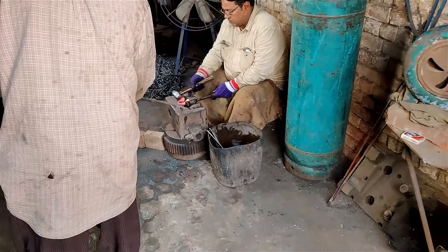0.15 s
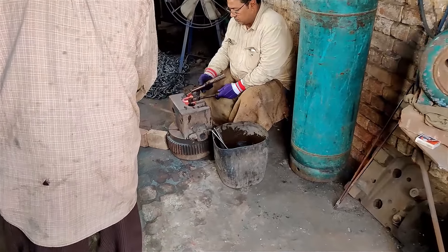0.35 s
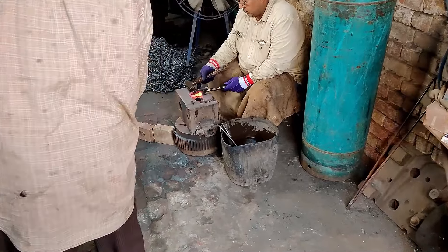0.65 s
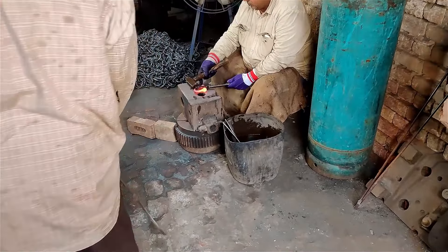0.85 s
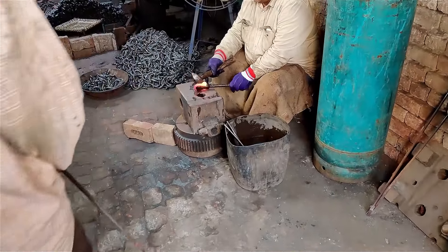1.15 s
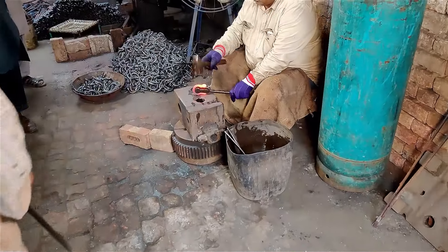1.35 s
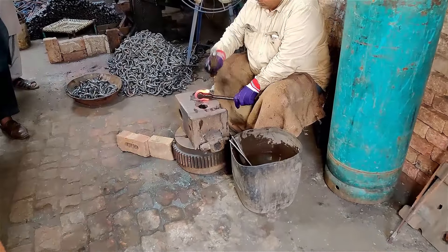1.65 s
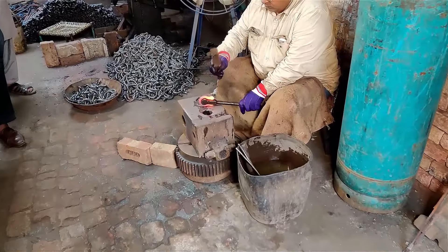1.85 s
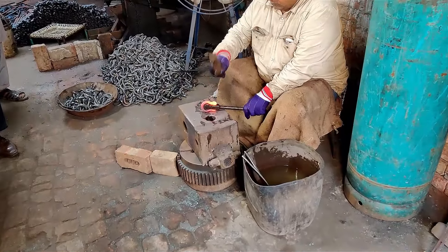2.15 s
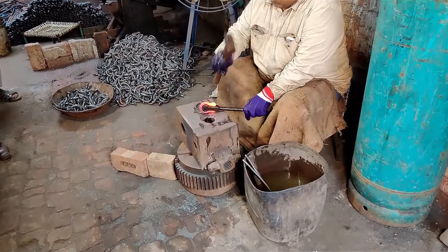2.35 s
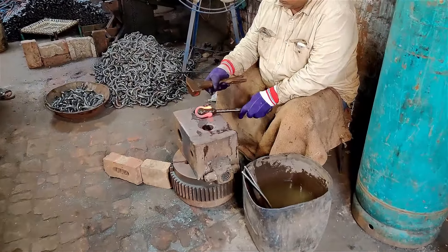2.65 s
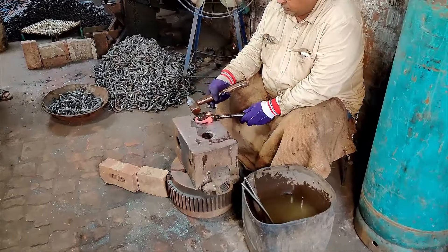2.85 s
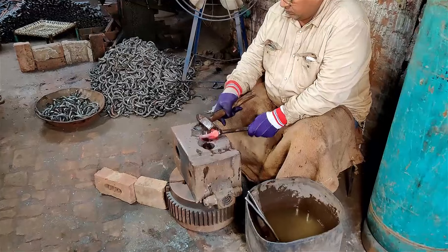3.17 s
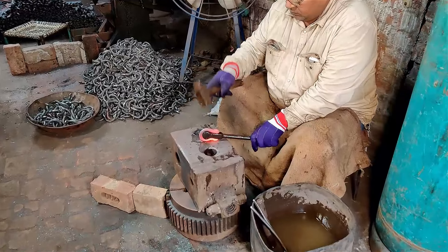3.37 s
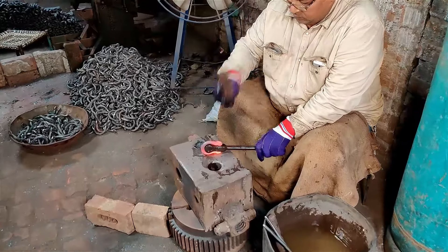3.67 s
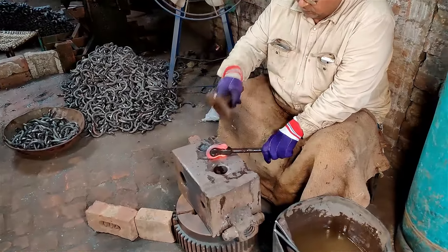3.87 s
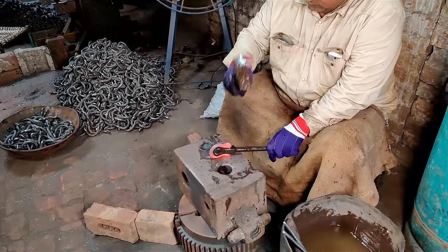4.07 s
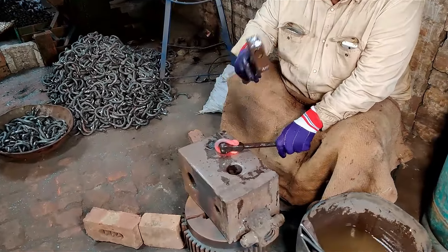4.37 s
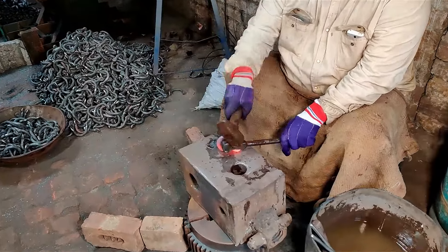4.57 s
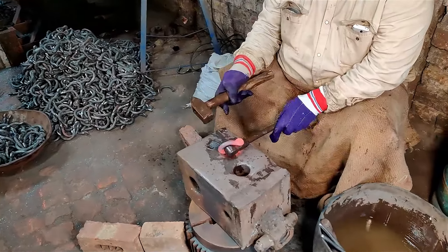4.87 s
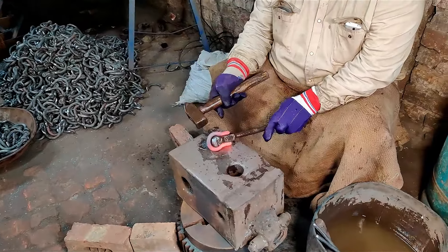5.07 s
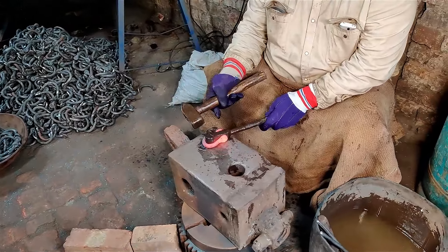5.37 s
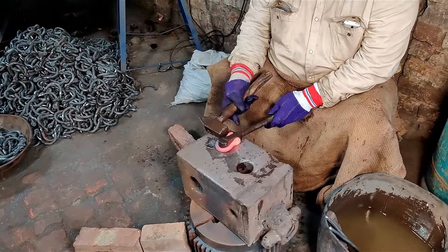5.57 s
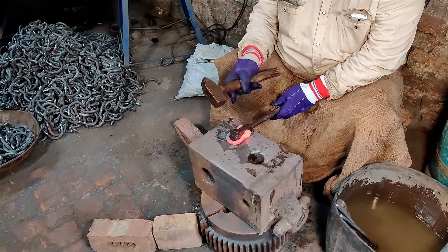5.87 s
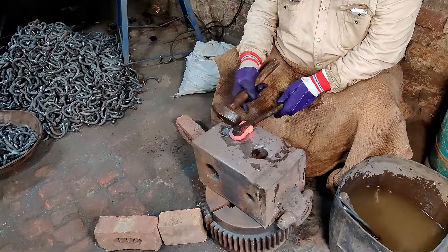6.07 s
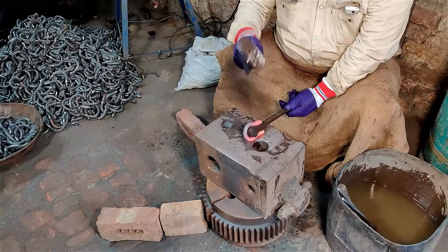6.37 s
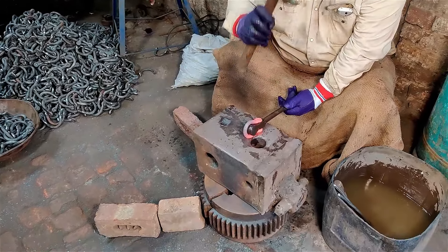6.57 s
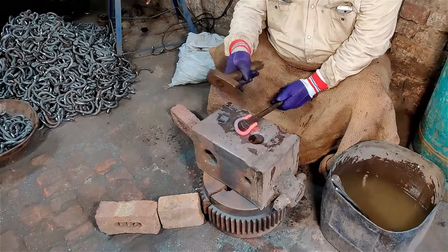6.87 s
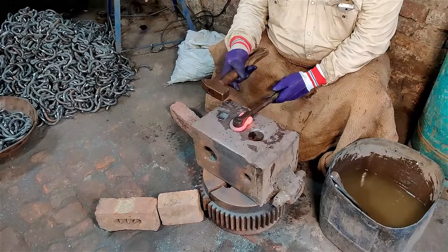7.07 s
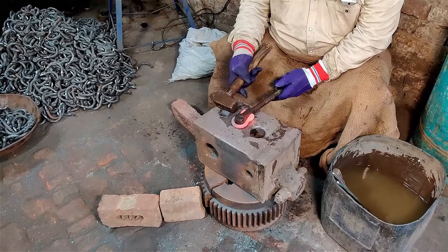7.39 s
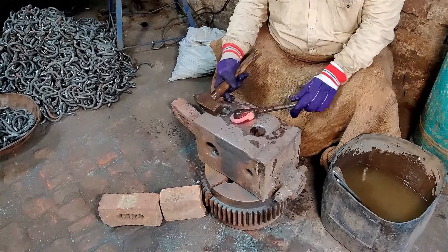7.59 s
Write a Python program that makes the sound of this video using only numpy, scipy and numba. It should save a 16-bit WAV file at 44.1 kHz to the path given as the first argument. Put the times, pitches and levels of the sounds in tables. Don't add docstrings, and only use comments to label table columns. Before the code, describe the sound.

Loud, flat, compressed rush of forge air fills the whole clip, its boomy low resonances shifting as the handheld phone walks closer to the smith. Muffled sledge clangs come about every half second, interleaved with quicker, higher hammer clinks. Near strikes crack dry and bright with short brick-wall echoes, mostly between two and five seconds, with one late. Tongs add small metallic taps and short thin pings.

```python
import sys
import numpy as np
from scipy import signal
from scipy.fft import rfft, irfft, next_fast_len
from scipy.io import wavfile
from scipy.ndimage import uniform_filter1d, minimum_filter1d
from numba import njit

SR = 44100
rng = np.random.default_rng(int(sys.argv[2]) if len(sys.argv) > 2 else 0)


def unload_wav(signal):
    wavfile.write(
        sys.argv[1],
        SR,
        np.round(np.clip(np.atleast_2d(signal).T, -1, 1) * 32767).astype(np.int16),
    )


def magnitude_from_level(level_db):
    exponent = np.asarray(level_db, float) / 20
    return 10 ** exponent


N = 340893

ROAR_PART_HZ = [
    50,
    300,
    1000,
    6000,
]
ROAR_START_DB = [-2.5, 1.5, -1.5, 3.5]
ROAR_SLOPE_DB_PER_M = [1.35, -1.7, -0.018, -0.71]
# (frequency [Hz], density [dB per Hz])
ROAR_LOW_DB = [(22, -14.5), (32, -9.5), (50, -5), (70, -10), (102, -18.5), (125, -5), (170, -2.5),
               (230, -7), (300, -15.5), (400, -22), (500, -29), (629, -29), (800, -22.5), (1000, -29.5)]
# (frequency [Hz], density [dB per Hz])
ROAR_HIGH_DB = [(1050, 5.5), (1400, 4.5), (1750, -2.5), (2400, -6.5), (3300, -10), (5000, -16), (8150, -19),
                (8500, -28.5), (11000, -31), (13600, -30), (14600, -38), (16500, -60.5)]
# (time [s], level [dB])
DRAUGHT_DB = [(0, -0.5), (.45, 2), (.72, -3), (.95, 1), (1.2, -3.5), (1.45, 2), (2.2, 0), (2.6, 2),
              (3.0, 1), (3.4, -1), (3.7, -0.5), (4.0, 2), (4.8, 1), (5.5, -0.5), (5.95, -0.5), (6.3, -0.5),
              (7.25, -1), (7.73, 1.5)]
# (frequency [Hz], common share [1])
COMMON_SHARE = [(60, .99), (200, .975), (350, .75), (600, .65), (1200, .6), (2400, .35), (8000, .4)]
# (frequency [Hz], left minus right [dB])
BALANCE_DB = [(60, .3), (380, .3), (700, -2), (1290, -1), (2380, 0), (4400, -1), (8120, -2.5), (15000, -4)]
# (time [s], place [m])
WALK_M = [(0, 0), (1, 0.53), (1.8, 1.23), (2.6, 0.5), (3.4, 1.27), (4.2, 1.68), (5.2, 2.5), (6.4, 2),
          (7.73, 3.5)]
# (frequency [Hz], width [Hz], wander [Hz], loop level [dB], loop [m], loop to node [m])
ROOM_MODES = [(80, 10.4, 1.98, -26.5, 2.7, 2.03), (138.1, 12.3, 4., -18, 1.3, 1.76),
              (156.5, 15, 4., -23, 2.6, 1.74), (49, 6.2, 1.5, -33, 1.2, 1.7),
              (169.2, 18, 4.014, -29, 0.23, .95), (203.4, 10.6, 4.44, -19.5, 0.28, 1.9),
              (736.4, 35, 16., -36.5, 1.75, 1.08), (693, 18, 3.04, -46, 0.26, 1.1),
              (186, 11.7, 2.92, -22.5, 2.8, 1.72), (226.2, 11.2, 3., -28.5, 2.63, 1.67),
              (271, 7.2, 2.98, -34, 2.8, 1.5), (474, 59, 10., -40.5, 2.5, 1.8)]
# (time [s], level [dB])
BLADE_DB = [(0.0, -36.5), (.3, -32), (.8, -30.5), (1.3, -30), (1.7, -26), (2.3, -34), (3.0, -32.5),
            (3.6, -36.5), (4.2, -35.5), (4.8, -37), (5.4, -39), (5.9, -39), (6.4, -44), (7, -48),
            (7.73, -39)]
# (time [s], frequency [Hz])
BLADE_SECOND_HZ = [(0, 394), (2.0, 394.2), (3.3, 393.6), (4.3, 394.8), (6.2, 394.6), (7.73, 394.2)]
# (time [s], peak [dB], clang against ring [dB], anvil tone [Hz])
SLEDGE_HITS = [(0.0014, -31, -5, 1830), (0.514, -29, -6, 1970), (1.0494, -30, -1, 1740),
               (1.5775, -38, -16, 1700), (2.6662, -26.5, -3.5, 1880), (3.2222, -28, -0.5, 1780),
               (4.3598, -27.5, -7, 1780), (4.926, -29.5, -3, 1760), (5.509, -28.5, 3, 1720),
               (6.1, -22.5, -5, 1780), (6.6982, -27.5, -4, 1760), (7.308, -27.5, -2.5, 1740)]
# (frequency [Hz], width [Hz], level [dB])
SLEDGE_RING = [(1760, 250, 3.5), (1950, 120, -0.5), (3660, 260, -6.5), (4870, 170, -4), (5520, 190, -2.5)]
# (time [s], peak [dB], clang against ring [dB], anvil tone [Hz])
HAND_HITS = [(0.2754, -33, 4.5, 2010), (0.31, -38, -12, 1980), (0.3701, -38, -16, 1870),
             (0.5402, -35, -19, 1970), (0.8185, -30, -3, 2020), (0.9832, -41, -2, 2020),
             (1.3014, -47, -6, 2060), (1.352, -33, -1.5, 1930), (1.8971, -28, -7, 1990),
             (2.4433, -38, -1.5, 2010), (2.608, -38, 1, 1980), (2.8704, -47, 0, 1900),
             (2.9916, -27.5, 0.5, 2025), (3.0999, -37, 0.5, 1850), (3.5493, -31, -1.5, 2030),
             (3.9994, -41, 8, 1930), (4.1195, -29.5, -10, 2016), (4.3714, -36, 0, 1800),
             (4.697, -28.5, -4, 2010), (5.27, -29.5, -6, 2070), (5.661, -49, -15, 2050),
             (5.7838, -61, -8, 1860), (5.864, -28, -2, 2040), (5.983, -38, -2, 1880),
             (6.444, -31.5, -0.5, 2050), (6.9731, -32, -14, 2025), (7.0579, -27, -4.5, 2000),
             (7.672, -23, -7.5, 2000)]
# (frequency [Hz], width [Hz], level [dB])
HAND_RING = [(2010, 88, 4.5), (1804, 63, -1.5), (4140, 45, -10.5), (5520, 710, -14), (7540, 820, -18.5)]
# (time [s], peak [dB], loudest mode re 4 kHz [octave], share of t60 [1], tick [dB])
TONG_TAPS = [(0.12, -44, .2, 0.41, -11), (.7262, -24.5, -0.22, 0.31, -34), (0.82, -51, .05, 0.46, -14),
             (2.086, -24, 0.44, 0.3, -21), (2.986, -38, 0.77, 0.68, 1), (2.997, -39, 0.41, 0.8, -4),
             (3.021, -43, 0.71, 0.65, -9.5), (3.93, -41, 0.36, 1.5, -14), (4.217, -48, 1.1, 0.9, -16),
             (4.594, -20, 0.44, 0.31, -24), (5.201, -38, 0.25, 0.67, -10), (5.393, -41.5, 0.29, 0.57, 8),
             (5.524, -49, 1.4, .6, -4), (5.559, -31.5, 0.67, 1.3, -2), (6.167, -28.5, 0.44, 1.15, -2.5),
             (6.177, -44, 1.5, .6, 11), (5.864, -44, 1.2, .3, 3), (.244, -40.5, 0.76, 0.82, 1.5),
             (6.201, -46.5, 0.94, 0.67, 0), (6.786, -27, -0.43, 0.75, -19), (6.973, -34, -0.53, 0.55, -30),
             (6.988, -31, 0.14, 1.1, -41), (7.017, -44, 0.83, .2, 14), (2.0808, -43, 1.2, .2, 9)]
# (frequency [Hz], level [dB], t60 [s])
TONG_MODES = [(2040, -5, .13), (4215, -3, .17), (5208, -12, .12), (6121, -16, .12), (6975, -6, .18),
              (7197, -6, .15), (7580, -13, .1), (8559, -14, .1), (9520, -13, .08), (10115, -8, .11),
              (10620, -6, .08), (10880, -12, .08), (13090, -9, .12), (14040, -10, .09), (14600, -12, .14)]
PING_S = [.618, .7262, 1.0695, 2.084, 2.0845, 2.4898, 2.49, 2.9876, 2.9876, 2.9876, 3.04, 3.5533, 3.7908,
          4.1644, 4.2165, 4.5905, 4.591, 4.596, 4.698, 5.394, 5.394, 5.559, 5.559, 5.68, 6.167, 6.175,
          6.445, 6.7855, 6.789, 6.792, 6.9731, 6.9731, 6.99]
# (level [dB], frequency [Hz], t60 [s], left minus right [dB])
PING_MODES = [(-40, 1800, .1, 0), (-38, 4215, 0.22, 1), (-35, 1990, .12, 0), (-26, 5700, .03, 0),
              (-32, 4200, .08, 0), (-28, 7700, .03, 0), (-38, 4200, .15, 1), (-43, 4215, 0.27, 7),
              (-40, 7100, .3, -5), (-47, 13090, .15, 0), (-35, 2030, 0.11, 0), (-46, 4100, .15, 5),
              (-32, 2300, .03, 0), (-37, 2030, .12, 0), (-33, 2000, .06, 0), (-27, 2900, .04, 0),
              (-28, 4215, .12, 6), (-31, 2200, 0.11, 2), (-44, 4050, .08, 0), (-39, 5208, .2, -5),
              (-49, 9200, .1, 0), (-49, 10620, .15, -5), (-49, 14600, .25, 0), (-37, 2300, 0.22, 0),
              (-51, 7197, .3, 0), (-48, 10115, .25, 4), (-43, 4600, .08, 1), (-28, 3000, .05, 0),
              (-35, 4215, 0.27, 5), (-34, 2200, .1, 0), (-36.5, 4215, .2, -2), (-35, 2020, 0.11, 0),
              (-36, 4215, 0.32, 0)]
# (time [s], peak [dB], limiter duck [dB], left minus right [dB], brightness [dB/octave])
BLOWS = [
    (1.7747, -28, 2.5, -1, 5.5),
    (2.0839, -19.5, 2, 1, 2.5),
    (2.4899, -17.5, 5.5, -2, 2.5),
    (3.7896, -21, 8.5, 5.5, 5),
    (4.2137, -20, 7.5, 2.5, 3.5),
    (4.59, -14.5, 4.5, -0.5, 1.5),
    (6.785, -16, 4.5, 6, 1),
]
# (block thud [dB], link chatter [dB], first echoes [dB], late room [dB], crack [dB])
BLOW_ANSWERS = [
    (-32, 1.5, 0.5, 0, -0.5),
    (-22, 2, -2, -2, 4),
    (-26, 2, -3, 2, 1),
    (-26, -4.5, -6, 2.5, 1),
    (-15.5, 3, -2, -1.5, 2),
    (-16, 8, -2.5, -2, 2),
    (-14, 6.5, -4, -1, 1),
]
# (frequency [Hz], density [dB per Hz])
CRACK_DB = [(400, -9.5), (800, 2.5), (1500, -7), (2500, -10.5), (4000, -10), (5500, -21), (7500, -11),
            (9600, -25.5), (15500, -15), (16300, -23), (16900, -64)]
# (frequency [Hz], width [Hz], level [dB])
BLOCK_MODES = [(1990, 130, 0), (3030, 330, 3.5), (3920, 140, -7), (5160, 950, 4.5), (7000, 200, -17),
               (9970, 250, 15), (13900, 210, -2.5)]

TIME = np.arange(N) / SR
SIZE = next_fast_len(N)
FREQ = np.maximum(np.arange(SIZE // 2 + 1) * SR / SIZE, 1)
PORT_LAG = 20
PORT_LAG_S = np.array([[PORT_LAG / SR], [0]])
HALF_PAN = np.array([[.5], [-.5]])


def level(x, db):
    return x * magnitude_from_level(db) / np.sqrt(np.mean(x ** 2))


def on_log(table, hz):
    table_hz, value = np.transpose(table)
    return np.interp(np.log(hz), np.log(table_hz), value)


def walk(rate_hz):
    k = int(SR / rate_hz)
    steps = np.repeat(rng.standard_normal(N // k + 1), k)
    return 1.14 * uniform_filter1d(uniform_filter1d(steps, k), k)[:N]


def ports(gain):
    common, left, right = rfft(rng.standard_normal((3, SIZE)))
    share = on_log(COMMON_SHARE, FREQ)
    lag_samples = np.interp(FREQ, [200, 350, 710, 1120], [11, 15, 14, PORT_LAG])
    late = np.exp(-2j * np.pi * FREQ * lag_samples / SR)
    direct = np.sqrt(share) * common * np.array([late, np.ones_like(late)])
    diffuse = np.sqrt(1 - share) * np.array([left, right])
    return gain * magnitude_from_level(on_log(BALANCE_DB, FREQ) * HALF_PAN) * (direct + diffuse)


def resonances(table):
    power = sum(magnitude_from_level(db) ** 2 / (1 + (2 * (FREQ - hz) / width_hz) ** 2) ** 2 for hz, width_hz, db in table)
    return np.sqrt(power)


def resonant_noise(response):
    return level(irfft(ports(response), SIZE)[:, :N], 0)


def dull(hz):
    return 1 / np.sqrt(1 + (FREQ / hz) ** 6)


def burst(start_s, rise_s, fall_s):
    age_s = np.clip(TIME - start_s, 0, None)
    shape = (1 - np.exp(-age_s / rise_s)) * np.exp(-age_s / fall_s)
    return shape / shape.max()


def place_m():
    return np.interp(TIME, *np.transpose(WALK_M))


def roar(flicker_db=1.5, grain_db=2.5, rms_db=-17.5):
    low_db, high_db = on_log(ROAR_LOW_DB, FREQ), on_log(ROAR_HIGH_DB, FREQ) - 36
    air = ports(magnitude_from_level(np.where(FREQ < 1025, low_db, high_db)))
    draught_db = np.interp(TIME, *np.transpose(DRAUGHT_DB))
    part_step = 2 * np.log2(np.array(ROAR_PART_HZ) / 24)
    out = 0
    for step in range(20):
        away = np.clip(2 * np.log2(FREQ / 24) - step, -1, 1)
        band = irfft(air * np.cos(np.pi / 2 * away) ** 2, SIZE)[:, :N]
        start_db = np.interp(step, part_step, ROAR_START_DB)
        slope_db_per_m = np.interp(step, part_step, ROAR_SLOPE_DB_PER_M)
        band_db = start_db + slope_db_per_m * place_m() + flicker_db * walk(9)
        if step > 8:
            band_db = band_db + draught_db
        if step > 10:
            band_db = band_db + grain_db * walk(30)
        out = out + band * magnitude_from_level(band_db)
    return level(out, rms_db)


def standing_waves(node_db=-16):
    out = 0
    for hz, width_hz, wander_hz, db, loop_m, quarter_m in ROOM_MODES:
        ring = level(irfft(ports(resonances([(hz, width_hz, 0)])), SIZE), db)
        drift = np.exp(2j * np.pi * np.cumsum(wander_hz * walk(2.5)) / SR)
        ring = np.real(signal.hilbert(ring)[:, :N] * drift)
        pressure = np.cos(np.pi / 2 * (place_m() - loop_m) / quarter_m)
        out = out + ring * np.hypot(pressure, magnitude_from_level(node_db))
    return out


def blades():
    rate_hz = np.interp(TIME, *np.transpose(BLADE_SECOND_HZ)) / 2 + 0.103 * walk(1.55)
    turn = 2 * np.pi * np.cumsum(rate_hz) / SR
    tone_db = np.interp(TIME, *np.transpose(BLADE_DB)) + 0.5 + 1.86 * walk(7)
    third_db = -44.5 - 1.6 * place_m() + 5.4 * walk(1.2)
    tone = (np.sin(2 * turn) + np.sin(turn)) * magnitude_from_level(tone_db)
    tone = np.sqrt(2) * (tone + magnitude_from_level(third_db) * np.sin(3 * turn))
    return np.array([np.roll(tone, PORT_LAG), tone])


def far_hammer(hits, rings, rise_s, fall_s, clang_hz, tone_db, octave_db, room_db=-24.0, room_s=0.085):
    ring = resonant_noise(resonances(rings))
    air_loss = dull(12500)
    clang = resonant_noise(resonances([(clang_hz, 2 * clang_hz, 0)]) ** 0.81 * air_loss)
    waver = magnitude_from_level(3.2 * np.array([walk(90), walk(90)]))
    out = 0
    for s, db, clang_db, hz in hits:
        swell = burst(s, rise_s, fall_s) ** 2
        wash = swell + magnitude_from_level(room_db) * burst(s, 2 * rise_s, room_s)
        turn = 2 * np.pi * hz * (TIME - s - PORT_LAG_S)
        octave = magnitude_from_level(octave_db) * waver[::-1] * np.sin(2.03 * turn)
        tone = magnitude_from_level(tone_db) * (waver * np.sin(turn) + octave)
        peak_ring = 1.26 * ring / np.abs(swell * ring).max()
        broad = magnitude_from_level(clang_db - 6.0) * wash * clang * waver ** 0.38
        out = out + magnitude_from_level(db) * (swell * (tone + peak_ring) + broad)
    return out


def far_anvil():
    sledge = far_hammer(SLEDGE_HITS, SLEDGE_RING, 0.013, 0.065, 2200, tone_db=-11.5, octave_db=-13.0)
    hand = far_hammer(HAND_HITS, HAND_RING, 0.00084, 0.053, 2400, tone_db=-7.5, octave_db=-10.5)
    return sledge + hand


def tong_taps():
    out, age_s = np.zeros((2, N + SR)), np.arange(SR // 2) / SR
    chance = rng.standard_normal((len(TONG_TAPS), 2, len(TONG_MODES), 2))
    click = 3 * np.sin(2 * np.pi * 6500 * age_s) * np.exp(-age_s / .00008)
    scrape = .25 * np.diff(rng.standard_normal((2, len(age_s) + 1))) * np.exp(-age_s / .0012)
    tick = click + scrape
    rattle = magnitude_from_level(3.4 * walk(70))
    rise = 1 - np.exp(-age_s / 0.00053)
    for (s, db, focus_oct, t60_share, tick_db), luck in zip(TONG_TAPS, chance):
        spread_oct = 0.22 + 0.7 * abs(focus_oct)
        start = int(s * SR)
        span = slice(start, start + len(age_s))
        for port in range(2):
            ring = 0
            for (hz, mode_db, t60_s), (db_luck, phase_luck) in zip(TONG_MODES, luck[port]):
                off = (np.log2(hz / 4000) - focus_oct) / spread_oct
                gain = magnitude_from_level(mode_db - 6.6 * off ** 2 + 4.6 * db_luck)
                decay = magnitude_from_level(-60 * age_s / (t60_s * t60_share))
                ring = ring + gain * np.sin(2 * np.pi * hz * age_s + phase_luck / 2) * decay
            out[port, span] += magnitude_from_level(db) * (ring * rattle[span] * rise + magnitude_from_level(tick_db) * tick[port])
    return out[:, :N]


def pings():
    out, waver = 0, magnitude_from_level(2.5 * np.array([walk(68), walk(66)]))
    for s, (db, hz, t60_s, pan_db) in zip(PING_S, PING_MODES):
        age_s = np.clip(TIME - s, 0, None)
        envelope = (1 - np.exp(-age_s / .001)) * magnitude_from_level(-60 * age_s / t60_s)
        ring = np.sin(2 * np.pi * hz * (age_s - PORT_LAG_S)) * envelope
        out = out + ring * magnitude_from_level(db + HALF_PAN * pan_db)
    return out * waver


def near_blows(tail_db=-16.5, tail_s=0.015, room_db=-23.0, crack_db=6.0):
    first_wall_s = 0.0045
    air = ports(magnitude_from_level(on_log(CRACK_DB, FREQ)) * (1 + resonances(BLOCK_MODES)))
    flutter = magnitude_from_level(2.8 * walk(300))
    block = resonant_noise(resonances([(1000, 1200, 0)]))
    out = 0
    for (s, db, _, pan_db, tilt_db), answer in zip(BLOWS, BLOW_ANSWERS):
        thud_db, chatter_db, echo_db, late_db, sharp_db = answer
        colour = air * magnitude_from_level(tilt_db * np.log2(FREQ / 4000))
        noise, early, late = irfft([colour, colour * dull(12500), colour * dull(9500)], SIZE)[..., :N]
        crack = (early + noise / 4) * burst(s, .00005, .0011)
        chatter = magnitude_from_level(chatter_db + 4.0) * burst(s, 0.00076, 0.0032)
        echoes = magnitude_from_level(echo_db) * burst(s + first_wall_s, 0.00066, tail_s)
        tail = magnitude_from_level(tail_db) * (chatter + echoes) * flutter * early
        tail = tail + magnitude_from_level(room_db + late_db) * burst(s, 0.0074, 0.04) * late
        blow = magnitude_from_level(crack_db + sharp_db) * crack / np.abs(crack).max() + tail / noise.std()
        thud = magnitude_from_level(thud_db - 9.5) * burst(s, .001, .009) * block
        out = out + blow * magnitude_from_level(db + 6.0 + HALF_PAN * pan_db) + thud
    return out


def scene():
    half_duck_s = 0.05
    duck_db = sum(db * np.exp(-((TIME - s - half_duck_s) / half_duck_s) ** 4) for s, _, db, *_ in BLOWS)
    steady = roar() + standing_waves() + blades() + far_anvil()
    return steady * magnitude_from_level(-duck_db) + tong_taps() + pings() + near_blows()


@njit
def limiter(peak, top, release):
    gain, g = np.empty(len(peak)), 1.
    for i in range(len(peak)):
        g = min(g + (1 - g) * release, top / peak[i])
        gain[i] = g
    return gain


def top_cut(x):
    return signal.sosfilt(signal.butter(12, 16300, fs=SR, output="sos"), x)


def record(dry):
    ahead = 130
    heard = signal.sosfilt(signal.butter(4, 36, "high", fs=SR, output="sos"), dry)
    heard = signal.sosfilt(signal.ellip(8, .3, 70, 16200, fs=SR, output="sos"), heard)
    peak = -minimum_filter1d(-np.abs(heard).max(0), 2 * ahead + 1) + 1e-9
    gain = uniform_filter1d(limiter(peak, 0.36, 1 / (0.0037 * SR)), ahead)
    fade = np.clip((TIME[-1] - TIME) / .002, 0, 1)
    return top_cut(heard * gain * fade)


dry = scene()
out = record(dry)
unload_wav(out)
```